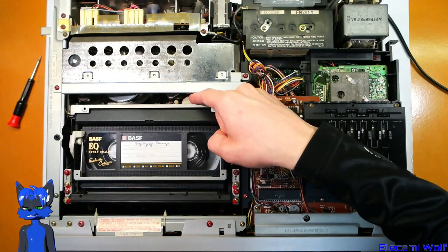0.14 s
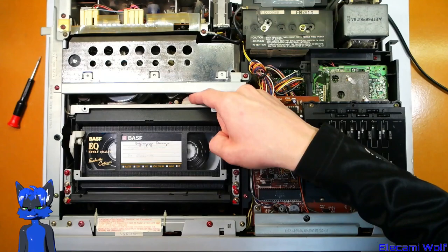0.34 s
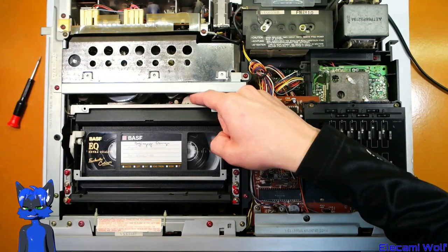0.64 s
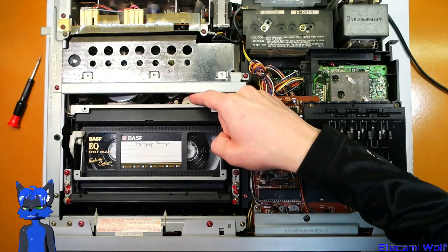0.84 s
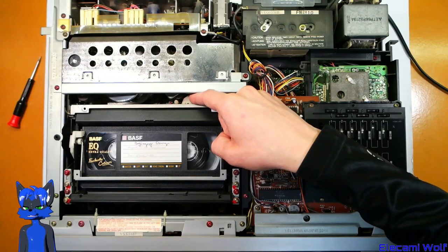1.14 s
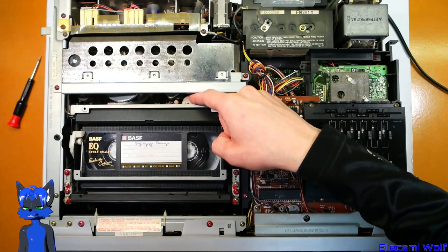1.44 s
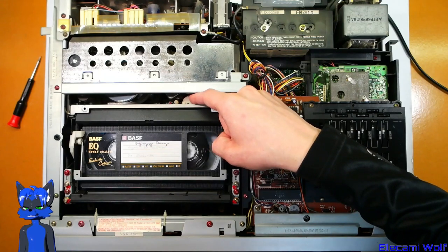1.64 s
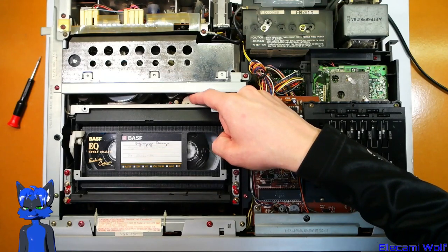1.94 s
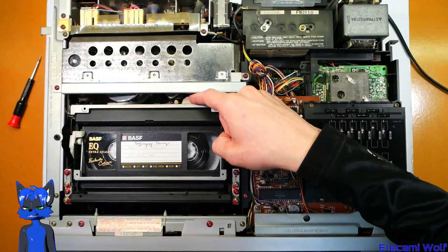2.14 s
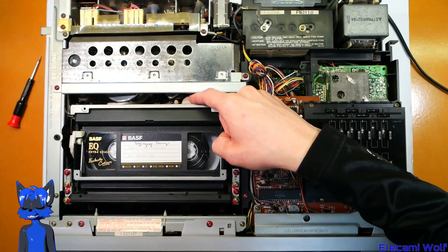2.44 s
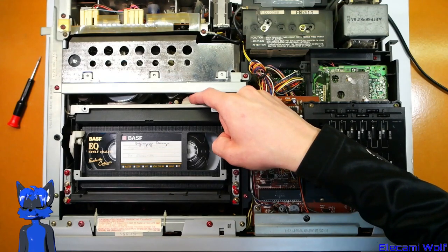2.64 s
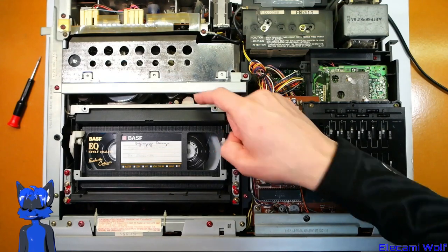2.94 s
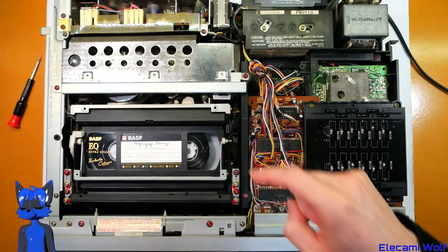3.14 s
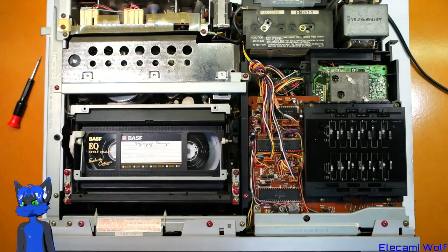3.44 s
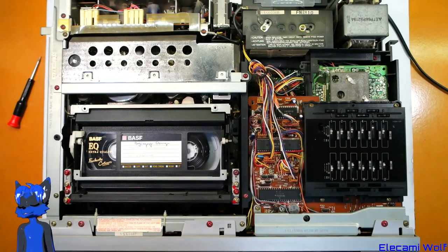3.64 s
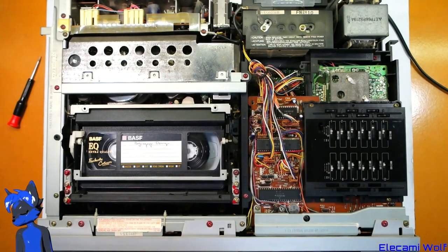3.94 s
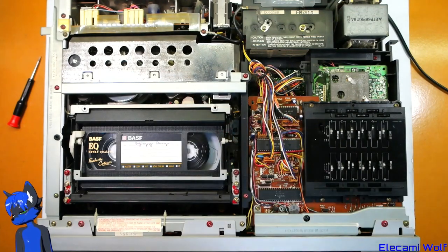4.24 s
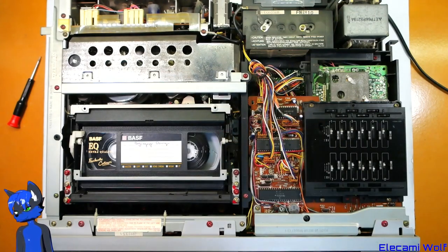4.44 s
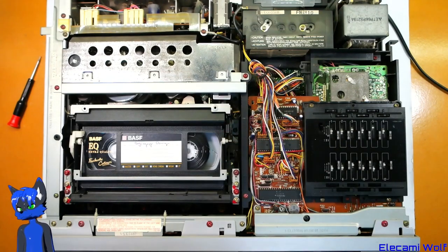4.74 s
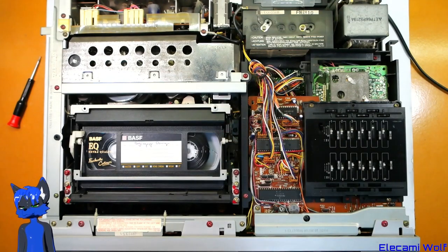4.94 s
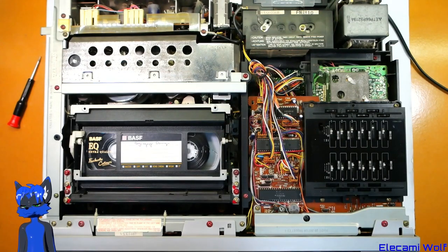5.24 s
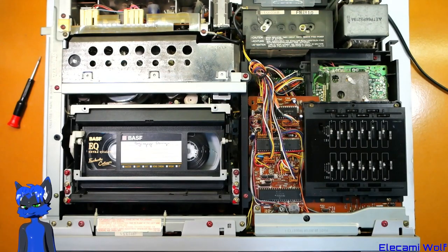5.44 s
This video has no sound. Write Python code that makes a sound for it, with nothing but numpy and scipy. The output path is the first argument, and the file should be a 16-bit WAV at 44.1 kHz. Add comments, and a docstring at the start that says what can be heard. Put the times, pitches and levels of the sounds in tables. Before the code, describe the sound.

Inside an open video cassette recorder, solenoids slam levers against the chassis with sharp metallic clacks, each trailing a brief hissy rattle. The first clack is followed by a faint motor whine and fine gear ticking, then a second clack. After a pause with only soft whirring comes a quick double clack and a final, loudest one. A single microphone hangs above the bench in a small room.

```python
"""Solenoids slam levers against the chassis of an open cassette recorder, in bursts of blows and bounces.
Each impact excites damped modes of the machine over a clatter of modes too dense to resolve.
A hissy, rattling noise swells after each slam, fades and stops. Motors whirr and whine softly beneath,
and a gear ticks round. A small room reverberates; one microphone above the bench feeds both channels."""
import sys
import numpy as np
from scipy import signal
from scipy.fft import rfft, irfft
from scipy.io import wavfile
from scipy.ndimage import uniform_filter1d

SR = 44100
rng = np.random.default_rng(int(sys.argv[2]) if len(sys.argv) > 2 else 0)


def int16_out(signal):
    """Quantize to a 16-bit WAV file."""
    q = np.round(np.clip(np.atleast_2d(signal).T, -1, 1) * 32767)
    wavfile.write(sys.argv[1], SR, q.astype(np.int16))


N = 245901

# reverberation time of the room: frequency_hz, t60_s
ROOM_DECAY = [(100, 0.43), (300, 0.54), (1000, 0.34), (2500, 0.25), (5000, 0.24), (8000, 0.21),
              (14000, 0.29)]
# hum of the running machine: pitch_hz, level_db
HUM_TONES = [(166, -80.5), (220, -83), (290, -80.5), (398, -78), (1230, -81), (1490, -84), (1690, -83.5),
             (1797, -81.5), (2405, -84)]
# motors running free: time_s, level_db, treble_rub_db
MOTOR_IDLE = [(0, -62, 8), (0.7, -64, 2.5), (1.5, -65.5, 2), (2.5, -63.5, 1.5), (2.899, -64.5, 1),
              (3.3, -63.5, 1.5), (4.001, -65, 3.5), (4.799, -65, 0), (5.4, -63.5, 3), (5.58, -57.5, -4.5)]
# hissy, rattling noise after the slams: start_s, top_db, sag_db_per_s, length_s, extra_treble_db
NOISE_TAILS = [(0.243, -51, -40, 0.23, 0.5), (0.4, -50, -18, .29, 7.5), (0.81, -54.5, -13.5, 0.15, 1),
               (1.95, -43.5, -53.5, .27, 15.5), (2.829, -54.5, -40, 0.059, 4), (4.36, -48, -62, 0.16, 15.5),
               (4.916, -41.5, -47.5, .3, 13.5)]
# spectral envelope of the whirr and the tails: frequency_hz, gain_db
NOISE_SPECTRUM = [(18, -25), (30, -17), (74, -15), (157, -2), (359, -1), (397, -3.5), (706, -6.5),
                  (863, -10), (1200, -5), (1970, -10), (2470, -13), (2870, -15.5), (7800, -32.5),
                  (8800, -39), (15600, -59.5)]
# cavity resonances of the machine: centre_hz, width_hz, gain_db
CAVITIES = [(1225, 37, -4), (1732.5, 14, 0.5), (2140, 18, -4.5), (2424, 130, -0.5), (3157, 100, 1),
            (3846, 30, 4.5), (4400, 43, -9)]
# partials of the motor whine: pitch_hz, base_level_db
WHINE_TONES = [(446.8, -77), (1190, -78.5), (1308, -83), (1464, -75.5), (1793, -80.5), (2067, -88.5),
               (2239, -82), (2412, -82.5)]
# gain on all those partials: time_s, gain_db
WHINE_ENVELOPE = [(0, -6), (.45, 9), (.65, 12), (1.1, 2.5), (2.2, 3.5), (2.6, -9), (3.7, -8.5), (3.85, -15),
                  (5.58, -12.5)]
# course of the turning gear: time_s, teeth_per_s, level_db
GEAR_MOTION = [(0.5025, 45, -58), (.56, 41, -60.5), (0.658, 45.9, -60), (0.759, 44, -68.5),
               (.85, 38.5, -61), (1.0, 38.3, -63.5), (1.061, 38, -69.5), (1.109, 33, -78)]
# bands of the chassis, levers, plungers, springs, contacts: low_hz, high_hz, base_t60_s, clatter_db, ring_db
PART_BANDS = [(125, 560, 0.14, -1.5, -3), (622.2, 3100, 0.085, 1, -0.5), (2800, 4800, 0.06, -3, 0.5),
              (4800, 7880, 0.044, 3, -5), (8400, 16900, 0.055, 3.5, -6)]
# normal modes of the machine: pitch_hz, gain_db, base_t60_s
MODES = [(193, -3.5, 0.1), (268, 1.5, 0.13), (315.5, -5, 0.14), (357.2, -4, 0.14), (1096.3, -1.5, 0.17),
         (1258, -4.5, 0.1), (1341, 3.5, .07), (1607, -7, .06), (1780, -6.5, 0.02), (2160, -5.5, 0.027),
         (2188, -8.5, 0.071), (2440, -8.5, 0.014), (2990, -3, .05), (3324, -2, .04), (3650, 2, 0.055),
         (3753, -9, 0.1), (3880, -8.5, 0.12), (3978, -9.5, .06), (4160, -0.5, 0.029), (4720, -6, 0.072),
         (4680, -5, .03), (5360, -2.5, 0.029), (6100, -4.5, .03), (6200, -1, 0.043), (6607, -4, .03),
         (6493, 0.5, .03), (7100, -2.5, .03), (9500, -4, .03), (11000, 2, 0.023), (14800, 4, 0.05)]
# when each linkage takes over as the transport shifts: start_s
LINKAGE_STARTS = [0, .7, 1.8, 4.0, 4.3, 4.6]
# each linkage's share of a blow and the pitches of its parts: chassis_db, lever_db, plunger_db,
# spring_db, contact_db, chassis_hz, lever_hz, plunger_hz, spring_hz, contact_hz
LINKAGE_PARTS = [(-2.5, -1.5, -2.5, -7.5, -21, 280, 1390, 3300, 6150, 11800),
                 (-1.5, 0, -3, -4.5, -22.5, 270, 1300, 4100, 6100, 9800),
                 (-4, -1, -0.5, 0, -19, 220, 2190, 3600, 6650, 11400),
                 (-12, -7, -1, -8.5, -33.5, 340, 1330, 4700, 6000, 11400),
                 (-2, 0, 1.5, -1, -19.5, 260, 1300, 4700, 6220, 13000),
                 (-8, -2, 0.5, -3, -21.5, 346, 1400, 3800, 6700, 11400)]
# levers scraping up to their stops: start_s, force_db, pitch_hz, brightness_db_per_part, swell_s
LEVER_SLIDES = [(0.390, -29.5, 2360, 3, 0.0056), (1.909, -34, 1183, 2, 0.0068),
                (4.318, -37.5, 11500, 1, 0.011), (4.871, -26, 1510, 2, 0.0072)]
# loose parts rebounding after a slam: start_s, force_db
REBOUNDS = [(0.412, -33.5), (1.941, -32), (4.277, -41), (4.352, -36.5), (4.889, -23.5)]
# main blows: start_s, force_db, pitch_hz, brightness_db_per_part, t60_factor
LEVER_BLOWS = [(0.246, -64, 382, -7.5, 0.92), (0.397, -24, 4720, -1.5, 1.4),
               (0.401, -20.5, 6400, 2.5, 1.04), (0.405, -31.5, 270, -1, 1.1),
               (0.409, -29, 1074, -2.5, 0.75), (0.426, -32.5, 1430, -0.5, 0.49),
               (0.498, -48.5, 2320, -1, 0.64), (0.815, -66, 325, 1.5, .73), (0.83, -55.5, 1255, 2, 1.7),
               (0.845, -54, 430, 1, 0.8), (1.649, -72, 1090, -3, .84), (1.916, -34, 4340, -1.5, 0.77),
               (1.921, -29, 6670, 0.5, 1.5), (1.9289, -17.5, 2140, 2.5, 0.66),
               (1.932, -18.5, 3450, -1.5, 1.06), (1.937, -18, 4260, 1, 0.73),
               (2.838, -72, 1242, -7.5, 0.69), (4.261, -18.5, 5320, 3, 0.32), (4.265, -23.5, 1325, 3, 1.07),
               (4.27, -41, 1290, 3.5, .8), (4.336, -33.5, 2600, 1, 1.05), (4.341, -25.5, 4630, -1.5, 0.82),
               (4.346, -26, 1500, 0.5, 1.11), (4.35, -32, 243, 0.5, 1), (4.36, -32.5, 11500, 0.5, .9),
               (4.883, -29.5, 6620, 2.5, 0.25), (4.8871, -13, 3900, 1.5, 0.73),
               (4.896, -23.5, 1604, 4.5, 0.75), (4.903, -26.5, 4400, -2, 0.79),
               (5.007, -53, 1290, -1.5, 1.7), (5.058, -54, 384, -5.5, 0.87), (5.075, -44, 4380, -5, 0.71),
               (5.085, -51.5, 4380, 2.5, .85), (5.371, -68.5, 1346, 0, 1.1)]

ROOM_DB, HISS_DB, TREBLE_HISS_DB = -17, -82.5, -86
NOTCH_HZ, NOTCH_WIDTH_HZ, CUTOFF_HZ = 853, 100, 15900
TAIL_RISE_S, TAIL_STOP_DB_PER_S, TAIL_TREBLE_FADE_S = 0.005, -110, 0.11
BOUNCE_GAP_S, BOUNCE_FADE_DB_PER_S, BOUNCE_SCATTER_DB = 0.011, -330, 1.5
BOUNCE_T60_FACTOR, SLIDE_T60_FACTOR = 0.75, 1.6
DIRECT_HIT_DB = 7  # extra force on the part hit squarely


def amp(db):
    """Amplitude ratio of a level in decibels."""
    return 10 ** (np.asarray(db) / 20)


def unit_rms(x):
    """Normalisation to an rms of 1."""
    return x / np.sqrt(np.mean(x ** 2) + 1e-20)


def curve_at(points, hz):
    """Interpolation on a logarithmic frequency axis."""
    f, value = np.transpose(points)
    return np.interp(np.log(hz + 1), np.log(f + 1), value)


def add(mix, start_s, sound):
    """Superposition of a sound on the mix."""
    part = mix[round(start_s * SR):][:len(sound)]
    part += sound[:len(part)]


def wander(rate_hz):
    """Slow random modulation: smoothed noise of rms near 1."""
    size = round(4 * N / SR * rate_hz) + 8
    knots = unit_rms(uniform_filter1d(rng.standard_normal(size), size=3))
    return np.interp(np.arange(N), np.linspace(0, N, size), knots)


def wavering_tone(hz, db, swell_db, swell_hz, drift, drift_hz):
    """A sinusoid under random amplitude and frequency modulation; drift is a fraction of its pitch."""
    gain = amp(db + swell_db * wander(swell_hz))
    pitch_hz = hz * (1 + drift * wander(drift_hz))
    return gain * np.sin(2 * np.pi * np.cumsum(pitch_hz) / SR)


def reverberation(x):
    """Convolution with a diffuse tail in which each band decays exponentially at its own rate."""
    hz, t, spectra = signal.stft(rng.standard_normal(SR), SR, nperseg=256)
    decay = amp(-60 * t / curve_at(ROOM_DECAY, hz)[:, None])
    tail = signal.istft(spectra * decay, SR, nperseg=256)[1]
    tail *= 1 - np.exp(-(np.arange(len(tail)) / SR / 0.013) ** 2)  # first reflections arrive late
    return signal.fftconvolve(x, tail / np.linalg.norm(tail))[:N]


def hum():
    """Steady vibration of the machine: faint tones, each modulated independently."""
    return sum(wavering_tone(hz, db, swell_db=4, swell_hz=4, drift=0.011, drift_hz=2.3)
               for hz, db in HUM_TONES)


def noise_envelope(t):
    """Incoherent powers add: the whirr plus tails that swell, fade and stop. Gives level and treble dB."""
    times, idle_db, treble_db = np.transpose(MOTOR_IDLE)
    power, treble_db = amp(2 * np.interp(t, times, idle_db)), np.interp(t, times, treble_db)
    for start_s, top_db, sag_db_per_s, length_s, extra_db in NOISE_TAILS:
        age = np.maximum(t - start_s, 0)
        rise = np.minimum(age / TAIL_RISE_S, 1)
        stop_db = TAIL_STOP_DB_PER_S * np.maximum(age - length_s, 0)
        power += rise * amp(2 * (top_db + sag_db_per_s * age + stop_db))
        treble_db += rise * extra_db * np.exp(-age / TAIL_TREBLE_FADE_S)
    return 10 * np.log10(power), treble_db


def motors_and_tails():
    """Source and filter: noise through cavities gives the whirr and the slams' tails; tones, the whine."""
    frame_s = np.arange(N // 128 + 5) * 128 / SR
    hz = np.fft.rfftfreq(512, 1 / SR)[:, None]
    real, imag = rng.standard_normal((len(frame_s), len(hz), 2)).T
    treble_band = np.exp(-(np.log2((hz + 1) / 5800) / 0.59) ** 2) / (1 + (hz / 8000) ** 12)
    boom_band = 0.25 * np.exp(-(np.log2((hz + 1) / 200) / 0.52) ** 2)  # louder noise booms more
    level_db, treble_db = noise_envelope(frame_s)
    emphasis = amp(treble_band * treble_db + boom_band * (level_db - level_db.min()))
    drive = signal.istft((real + 1j * imag) * emphasis, nperseg=512, noverlap=384)[1][:N]
    hz = np.fft.rfftfreq(N, 1 / SR)
    resonance = 0.7 + sum(amp(db) / (1 + (2 * (hz - f) / width) ** 2) for f, width, db in CAVITIES)
    noise = unit_rms(irfft(rfft(drive) * resonance * amp(curve_at(NOISE_SPECTRUM, hz)), N))
    whine = sum(wavering_tone(f, db, swell_db=1.2, swell_hz=22, drift=0.0023, drift_hz=4.7)
                for f, db in WHINE_TONES)
    t = np.arange(N) / SR
    noise_db = np.interp(t, frame_s, level_db) + 0.2 * wander(7.9)
    whine_db = np.interp(t, *np.transpose(WHINE_ENVELOPE))
    return noise * amp(noise_db) + whine * amp(whine_db)


def gear():
    """An impulse train: each tooth flicks a spring whose two close modes beat. Gives start and sound."""
    times, teeth_per_s, db = np.transpose(GEAR_MOTION)
    t = np.arange(times[0], times[-1], 1 / SR)
    teeth_passed = np.floor(np.cumsum(np.interp(t, times, teeth_per_s)) / SR)
    flick_db = np.interp(t, times, db) + 1.5 * rng.standard_normal(len(t))
    flicks = np.diff(teeth_passed, prepend=0) * amp(flick_db)
    age = np.arange(1500) / SR
    ping = sum(gain * np.sin(2 * np.pi * hz * age) for hz, gain in [(7900, 1), (7650, .85), (10900, .12)])
    scrape = rng.standard_normal(len(age)) * np.exp(-age / 0.0025)  # the tooth lets go
    envelope = amp(-60 * age / 0.028) * (1 - np.exp(-age / 0.0015))
    return times[0], signal.oaconvolve(flicks, (ping + scrape) * envelope)


def impact_response(forces_db, pitches_hz, t60_factor):
    """Damped free vibration: each part rings in the modes near its struck pitch, over a dense clatter."""
    t = np.arange(12000) / SR
    decay = -60 * t / t60_factor  # dB once divided by a base t60
    sound, chance = np.zeros(len(t)), rng.standard_normal((len(MODES), 2))
    for force_db, hz, part in zip(forces_db, pitches_hz, PART_BANDS):
        low_hz, high_hz, t60, clatter_db, ring_db = part
        band = signal.butter(4, [low_hz, high_hz], "bandpass", fs=SR, output="sos")
        noise = signal.sosfilt(band, rng.standard_normal(len(t)))
        noise += 3 * signal.lfilter(*signal.iirpeak(hz, Q=5, fs=SR), noise)
        clatter = unit_rms(noise) * amp(clatter_db + decay / t60)
        ring = np.zeros(len(t))
        for (mode_hz, mode_db, mode_t60), (scatter, phase) in zip(MODES, chance):
            if 0.9 * low_hz <= mode_hz < 1.02 * high_hz:
                octaves_off = abs(np.log2(mode_hz / hz))
                level_db = mode_db + 3.5 * scatter - 100 * octaves_off + decay / mode_t60
                ring += amp(level_db) * np.sin(2 * np.pi * mode_hz * t + 3 * phase)
        rise = 1 - np.exp(-t / (0.00028 + 0.18 / low_hz))  # low parts take longer to start moving
        sound += amp(force_db) * rise * (clatter + amp(ring_db) * ring)
    return sound


def lever_slide(start_s, force_db, hz, brightness_db, swell_s):
    """Sliding friction, heard as a blow that swells in while the lever gathers speed."""
    sound = lever_blow(start_s, force_db, hz, brightness_db, SLIDE_T60_FACTOR)
    return sound * np.minimum(np.arange(len(sound)) / SR / swell_s, 1) ** 2


def bounces(start_s, force_db, count=6):
    """Inelastic rebounds of loose parts: rows of uneven, fading blows at random pitches."""
    gap, piece, scatter = rng.random((count, 3)).T
    delays_s = np.cumsum(BOUNCE_GAP_S * (0.5 + gap))
    forces_db = force_db + BOUNCE_FADE_DB_PER_S * delays_s + BOUNCE_SCATTER_DB * (2 * scatter - 1)
    return [(start_s + delay, db, hz, 0, BOUNCE_T60_FACTOR)
            for delay, db, hz in zip(delays_s, forces_db, 240 * 28 ** piece)]


def lever_blow(start_s, force_db, hz, brightness_db, t60_factor):
    """Mechanical coupling: the linkage in motion spreads one impact over all its parts."""
    linkage = LINKAGE_PARTS[np.searchsorted(LINKAGE_STARTS, start_s) - 1]
    share_db, part_hz = np.reshape(linkage, (2, -1))
    direct_hit = np.array([low <= hz < high for low, high, *_ in PART_BANDS])
    tilt_db = brightness_db * (np.arange(len(PART_BANDS)) - 2)
    forces_db = force_db + share_db + tilt_db + DIRECT_HIT_DB * direct_hit
    return impact_response(forces_db, np.where(direct_hit, hz, part_hz), t60_factor)


def scene():
    """Superposition at one microphone: the mechanism, its reverberation, motors, noise tails and hum."""
    mechanism = np.zeros(N)
    rebounds = [blow for row in REBOUNDS for blow in bounces(*row)]
    for row in LEVER_BLOWS + rebounds:
        add(mechanism, row[0], lever_blow(*row))
    for row in LEVER_SLIDES:
        add(mechanism, row[0], lever_slide(*row))
    add(mechanism, *gear())
    heard = mechanism + amp(ROOM_DB) * reverberation(mechanism) + motors_and_tails() + hum()
    return np.array([heard, heard])


def record(dry):
    """Signal chain: a notch, shared hiss, soft saturation, treble hiss in antiphase, then a low-pass."""
    mid = signal.lfilter(*signal.iirnotch(NOTCH_HZ, NOTCH_HZ / NOTCH_WIDTH_HZ, SR), dry[0])
    mid_noise, side_noise = rng.standard_normal((2, N))
    mid += amp(HISS_DB) * mid_noise
    mid /= (1 + abs(mid / 0.93) ** 6) ** (1 / 6)  # the loudest peaks overload softly
    highpass = signal.butter(6, 3700, "highpass", fs=SR, output="sos")
    side = amp(TREBLE_HISS_DB) * signal.sosfilt(highpass, side_noise)
    lowpass = signal.firwin(1023, CUTOFF_HZ, window=("kaiser", 10), fs=SR)
    return signal.oaconvolve(np.array([mid + side, mid - side]), lowpass[None], "same")


dry = scene()
out = record(dry)
int16_out(out)
```